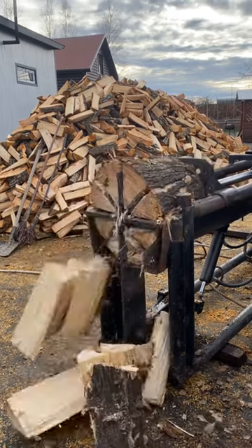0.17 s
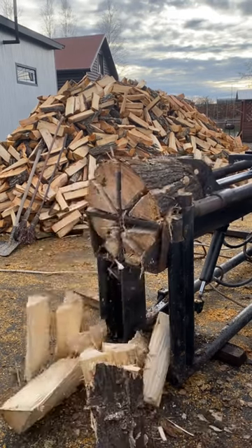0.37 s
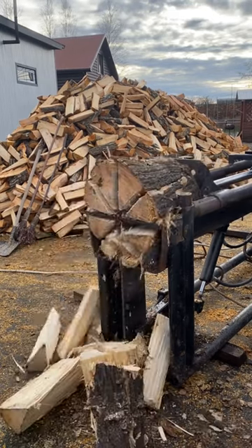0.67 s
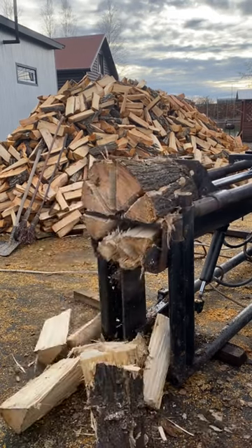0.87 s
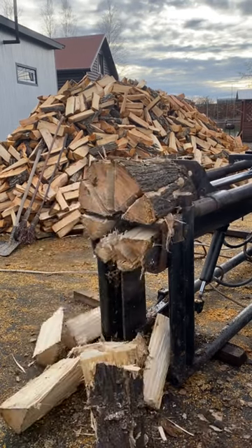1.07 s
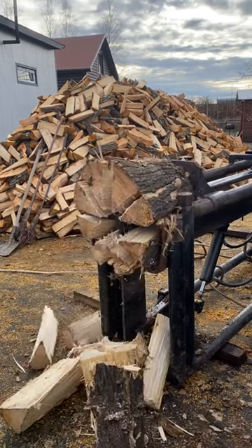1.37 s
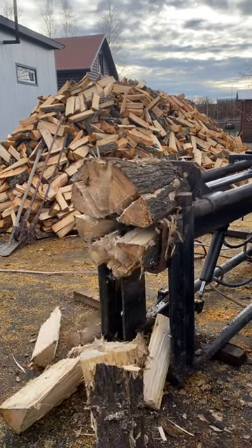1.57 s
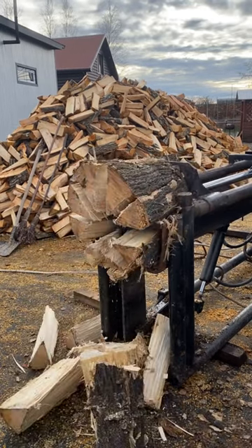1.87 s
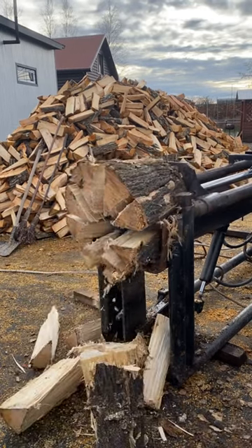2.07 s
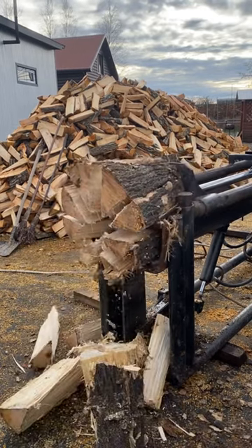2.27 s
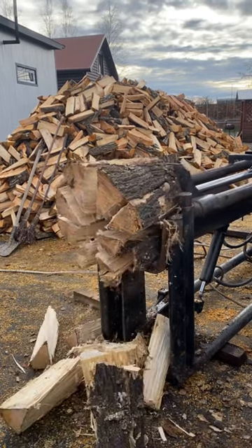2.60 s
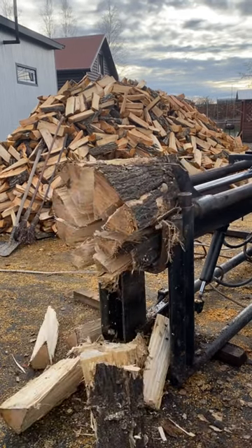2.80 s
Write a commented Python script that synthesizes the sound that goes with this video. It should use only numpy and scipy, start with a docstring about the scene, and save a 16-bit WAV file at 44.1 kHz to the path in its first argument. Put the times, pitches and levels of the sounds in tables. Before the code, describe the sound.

Log splitter engine drones with a whining hydraulic pump while split wood thumps, cracks and knocks

```python
"""An engine drones and a hydraulic pump whines: a petrol log splitter in an open yard, sagging a little under
load. Split pieces thump and clatter to the ground; the next log crackles on the wedge, then gives way in hollow
knocks. The wood is close, and its loudest peaks are flattened hard. At the end the ram bites: the pump sags,
its whine swells in the valve. Engine and pump are sums of harmonics on one shaft; roar and rumble are shaped
noise. Cracks are noise bursts through resonances; thumps and knocks are damped modes, with a few dull echoes."""
import sys
import numpy as np
from scipy import signal
from scipy.fft import rfft, irfft
from scipy.io import wavfile

SR = 44100
rng = np.random.default_rng(int(sys.argv[2]) if len(sys.argv) > 2 else 0)


def int16_out(signal):
    """Quantize to a 16-bit WAV file."""
    q = np.round(np.clip(np.atleast_2d(signal).T, -1, 1) * 32767)
    wavfile.write(sys.argv[1], SR, q.astype(np.int16))


N = 129654  # samples, just under three seconds

# Dull rumble of air and shifting wood. Each row: time in seconds, level in dB before a slow sway.
RUMBLE_LEVEL = [(0, -30.5), (.25, -34), (.45, -34.5), (.65, -33.5), (1.1, -39), (1.85, -38.5), (2.06, -27),
                (2.2, -43), (2.4, -31.5), (2.7, -33), (2.94, -30)]
# Resonances of the rumble. Each row: frequency in Hz, width in Hz, relative level in dB.
RUMBLE_MODES = [(66, 21.5, 2), (278, 140, -1.6)]
RUMBLE_SWAY_DB = 1.5

# Spectrum of the engine and fan noise. Each row: frequency in Hz, relative density in dB per Hz.
ROAR_SPECTRUM = [(25, -24), (80, -24), (130, -12), (200, -13.5), (430, -7), (520, -16), (620, -10.5),
                 (760, -13), (950, -16), (1200, -20.5), (1620, -13), (1950, -13.5), (2400, -22),
                 (3100, -17), (4000, -20.5), (4550, -8.5), (4900, -19.5), (5500, -14.5), (7000, -25.5),
                 (8600, -22), (9900, -37)]
# Gain of the noise below about 1 kHz. Each row: time in seconds, gain in dB before a slow sway.
ROAR_LOW_LEVEL = [(0, -21), (.45, -27.5), (.75, -28.5), (1.1, -25.5), (1.6, -24.5), (1.95, -25),
                  (2.09, -15.5), (2.17, -21.5), (2.5, -21), (2.94, -26)]
# Gain of the noise above it. Each row: time in seconds, gain in dB before a flicker.
ROAR_HIGH_LEVEL = [(0, -38), (.35, -26), (.5, -54), (.57, -29), (.8, -29), (.96, -31), (1.0, -29.5),
                   (1.3, -28), (1.58, -27), (1.63, -30), (2.0, -29), (2.28, -24), (2.35, -27.5), (2.8, -30),
                   (2.94, -23.5)]
# Valve ticks in each engine cycle. Each row: share of the cycle, width as share of the cycle, strength.
VALVE_TICKS = [(.23, 0.14, 1), (0.499, 0.011, 1)]
PUMP_FLUTTER = 0.13  # depth of the pump's pulsing, on the same scale as the tick strength
ROAR_SWAY_DB, HISS_FLICKER_DB = 1.5, 0.8

# Shaft speed as the pump pulse rate. Each row: time in seconds, rate in Hz.
PULSE_RATE = [(0, 197.7), (.85, 197.6), (1.5, 197.3), (2.05, 196.5), (2.13, 197.3), (2.7, 197.7),
              (2.84, 197.4), (2.94, 191.1)]
PULSES_PER_FIRING = 8
# Strong exhaust orders. Each row: multiple of the firing rate, relative level in dB.
EXHAUST_ORDERS = [(3, -40), (7, -41), (9, -37.5), (11, -40), (13, -38.5), (15, -44), (17, -38), (18, -35),
                  (21, -48.5), (25, -37.5), (34, -43.5), (38, -41.5), (66, -47), (67, -42), (68, -41),
                  (69, -40)]
# Weak engine orders. Each row: frequency in Hz, relative level of each order in dB.
BUZZ_SPECTRUM = [(25, -69), (150, -59), (290, -43), (400, -50), (520, -49), (800, -55), (1200, -50),
                 (1500, -51), (1800, -46.5), (2080, -47), (2260, -55), (2520, -57), (2900, -50),
                 (3300, -50), (4300, -46.5), (4800, -54), (5600, -52.5), (8000, -55.5), (9500, -60)]
# Gain of the whole engine tone. Each row: time in seconds, gain in dB.
ENGINE_LEVEL = [(0, 2), (.38, -2.5), (.45, -3.5), (.6, -1), (.97, 1.5), (1.0, -3), (1.58, 0), (1.63, -1.5),
                (2.05, 0.5), (2.28, -0.5), (2.33, -1), (2.8, -2.5), (2.94, -2.5)]
BUZZ_SPREAD_DB, EXHAUST_WAVER_DB = 2, 1.5

# Pump harmonics. Each row: multiple of the pulse rate, relative level in dB at first,
# relative level in dB once the wedge is deep in the log.
PUMP_HARMONICS = [(1, -32.5, -31), (2, -21.5, -31.5), (3, -42.5, -31), (4, -37, -44), (5, -31.5, -33),
                  (7, -30.5, -39.5), (8, -22.5, -27), (9, -29, -38), (10, -32, -32), (11, -35.5, -40),
                  (12, -40, -45), (13, -47, -46.5), (15, -41, -41), (16, -34, -37), (18, -38, -48),
                  (19, -37, -40.5), (20, -39.5, -41.5), (21, -51, -44), (22, -37, -47), (23, -31, -37),
                  (26, -38, -41.5), (27, -44, -52), (30, -43, -44), (31, -39, -47.5), (32, -47, -59),
                  (33, -54, -51), (35, -50, -46.5), (36, -47, -47), (37, -44, -49.5), (38, -56, -59),
                  (39, -51, -49.5), (42, -60, -51), (43, -49, -54), (44, -52, -49), (47, -49.5, -49.5)]
DEEP_FROM_S, DEEP_BY_S = 1.136, 1.62
DEEP_GAIN_DB = -1  # added to every deep level
# Gain of the pump tone. Each row: time in seconds, gain in dB.
PUMP_LEVEL = [(0, -4), (.4, -4), (.6, -1.5), (.95, -0.5), (1.03, -3), (1.4, 3.5), (1.62, 2.5), (1.98, 5.5),
              (2.08, 3), (2.2, 4.5), (2.4, 1), (2.65, 3), (2.8, 1), (2.94, -2.5)]
# Extra gain of the hum, the 2nd harmonic. Each row: time in seconds, gain in dB.
HUM_LEVEL = [(0, -3), (.6, -2), (.85, -1), (1.35, 2.5), (1.7, 3.5), (1.95, 1.5), (2.1, -3.5), (2.35, -4.5),
             (2.6, -3.5), (2.94, 2.5)]
# Extra gain of the whine, the 8th and 9th harmonics. Each row: time in seconds, gain in dB.
WHINE_LEVEL = [(0, 3), (.3, 3), (.43, 0.5), (.8, 1), (1.3, -1.5), (1.65, -3.5), (2.08, -1.5), (2.24, -1),
               (2.34, -1.5), (2.7, -4.5), (2.94, -0.5)]
# Valve resonances, climbing with the pressure. Each row: final frequency in Hz, width in Hz, peak gain in dB.
VALVE_MODES = [(1732, 96, 19.5), (4350, 240, 12), (4080, 170, 12.5), (860, 140, 16)]
BITE_FROM_S, BITE_BY_S = 2.83, 2.885
VALVE_CLIMB_PER_S = 0.7  # exponential rate
PHASE_JITTER = 0.008  # radians at the pulse rate
WAVER_DB, WAVER_HZ = 0.6, 3

# Pieces land, the frame shakes. Each row: start in seconds, level in dB before the wood gain,
# pitch in Hz, decay by 60 dB in seconds.
THUMPS = [(0.032, -6, 320, 0.026), (0.1555, 1.5, 334, 0.05), (.158, 0.5, 130, 0.071),
          (0.164, -7, 192, 0.073), (.198, -11, 82, 0.051), (0.29, -8.5, 97, 0.051),
          (.372, -13.5, 143, 0.037), (0.4, -10.5, 358, 0.068), (0.59, -15, 99, 0.13),
          (0.8317, 10.5, 418, 0.01), (.833, -9, 203, 0.062), (0.847, -12, 316, .04), (1.981, -11, 97, .07),
          (2.046, 0, 337, 0.02), (2.058, -13, 108, 0.1), (2.077, -17, 246, 0.062), (2.092, -11, 84, 0.045),
          (2.153, -18, 75.5, .08), (0.01, -16, 120, 0.047), (.235, -18.5, 134, .06),
          (0.072, -11.5, 156, .06), (2.331, -18, 80.2, .08), (2.641, -6.5, 178, 0.045),
          (2.648, -13.5, 80, .07), (2.799, -5.5, 117, 0.047), (2.803, -8.5, 63.3, 0.05),
          (2.863, -4.5, 190, 0.02), (2.881, -13, 79, .09)]
THUMP_RISE_S = 0.0015
WOOD_GAIN_DB = 4.0  # lifts the thumps and the main mode of the knocks

# Fibres snap, pieces clack. Each row: start in seconds, level in dB, decay by 60 dB in seconds, snap pitch in Hz,
# relative level in dB of the woody body, relative level in dB of the bright splinter.
CRACKS = [(0.033, -23, 0.045, 1480, 10.5, -22), (0.039, -24, 0.022, 3500, 2, 15.5),
          (0.0845, -7, 0.022, 4160, -3.5, -3), (.131, -19, 0.02, 4240, 6, 14.5),
          (0.2405, -15.5, 0.028, 2820, 1, -4), (0.2847, -7.5, 0.016, 5050, -18, -1.5),
          (.327, -13, 0.027, 4140, -24, 4), (0.3309, -1.5, 0.015, 4030, -7, -7),
          (0.3422, -9, 0.02, 2650, -1, -15), (0.3775, -6.5, 0.025, 3520, -2.5, 5),
          (0.386, -13, 0.024, 2200, 8, -13), (0.398, -4.5, 0.037, 2130, -1.5, -2.5),
          (.405, -26.5, 0.09, 2320, 12.5, -7), (0.45, -21, 0.019, 1500, 14, -16),
          (0.462, -28.5, 0.018, 5000, -9, 15.5), (.55, -16.5, 0.024, 5170, 5, 1),
          (0.562, -17.5, 0.065, 2020, 4.5, 0), (.689, -12, 0.041, 2110, -7.5, -2.5),
          (.9285, -20.5, 0.1, 3650, -18, 6), (.956, -14, 0.024, 3470, -15, -14),
          (0.969, -12, 0.011, 4400, -17, -1), (0.9793, -11, 0.016, 3040, -21, 12.5),
          (1.3961, -5.5, 0.014, 2010, -3, -0.5), (1.448, -14, 0.023, 4460, -15, 6.5),
          (1.587, -18, 0.025, 4050, 2, 8.5), (1.5989, -1, 0.012, 4400, -10, 3),
          (2.039, -11, 0.02, 1140, 10, -11), (2.041, -20.5, 0.08, 4000, -8, -6),
          (2.2846, 0.5, 0.016, 3440, -4, -2)]
# Resonances of each snap. Each row: multiple of its pitch, width as share of that pitch, relative level in dB.
SNAP_MODES = [(1, 0.37, 0.5), (1.6, 0.58, -2)]
# Resonances of the woody body. Each row: frequency in Hz, width in Hz, relative level in dB.
CRACK_BODY_MODES = [(450, 290, -5.5), (1070, 490, 0)]
# Resonances of the fine crackle. Each row: frequency in Hz, width in Hz, relative level in dB.
CRACKLE_MODES = [(2100, 1300, -1), (4200, 530, -4)]
# Resonances of splinters and crackle. Each row: frequency in Hz, width in Hz, relative level in dB.
SPLINTER_MODES = [(7060, 4600, -2.5), (9380, 1800, -12.5)]
CRACK_RISE_S = 0.0005
CRACKLE_PER_S, CRACKLE_END_S = 58, 1.62
CRACKLE_DB = -25  # the weakest crackle

# The log slips on the wedge. Each row: start in seconds, level in dB before later gains, pitch in Hz,
# decay by 60 dB in seconds, relative level of the overtones in dB.
KNOCKS = [(2.0405, -2.5, 680, 0.019, 1), (2.047, 4, 660, 0.028, -4), (2.061, -2, 647, 0.034, 3),
          (2.3125, 5.5, 637, 0.038, -9), (2.4273, 4.5, 627, 0.044, 2.5), (2.5588, 0.5, 622, 0.059, 5.5),
          (2.629, 3, 638, 0.033, 3.5), (2.697, 7, 625, 0.032, 0.5), (2.7825, 5.5, 635, 0.04, 5)]
# Overtones of the log. Each row: frequency in Hz, relative level in dB, decay by 60 dB in seconds.
LOG_OVERTONES = [(840, -30, 0.059), (1004, -16.5, 0.025), (1130, -12.5, 0.015), (1334, -15.5, 0.016),
                 (2170, -25, 0.023)]
# Resonances of the tearing wood. Each row: frequency in Hz, width in Hz, relative level in dB.
TEAR_MODES = [(286, 92, 1), (655, 330, 4.5)]
KNOCK_RISE_S, OVERTONE_RISE_S = 0.0027, 0.00084
KNOCK_TICK_DB, KNOCK_TICK_S = -14.5, 0.019
TEAR_DB, TEAR_S = -24.5, 0.16

# Echoes from the woodpile and sheds. Each row: delay in seconds, level in dB.
ECHOES = [(.011, -26.5), (.034, -18.5), (.061, -27)]
ECHO_CUT_HZ = 4600
MIC_LOW_HZ, MIC_TOP_HZ, CUTOFF_HZ = 33.4, 9900, 16000


def from_db(db):
    """Decibels to gain."""
    return 10 ** (np.asarray(db) / 20)


def rms_one(x):
    """Scale to unit rms."""
    return x / np.sqrt(np.mean(x ** 2) + 1e-20)


def in_time(rows):
    """A table of times and values as a curve at every sample."""
    return np.interp(np.arange(N) / SR, *np.transpose(rows))


def at_hz(points, hz):
    """Read a spectrum in dB on a log frequency axis."""
    f, db = np.transpose(points)
    return np.interp(np.log(hz), np.log(f), db)


def drift(rate_hz):
    """Slow random wandering of unit rms: noise through two equal poles, drawn at every 40th sample."""
    pole = np.exp(-2 * np.pi * rate_hz * 40 / SR)
    noise = rng.standard_normal(N // 40 + 2002)
    slow = signal.lfilter([1], [1, -2 * pole, pole * pole], noise)[2000:]  # drop the filter's start
    return np.interp(np.arange(N) / 40, np.arange(len(slow)), rms_one(slow))


def resonate(x, modes):
    """Parallel resonances of alternating sign; unit white noise leaves each at its listed level."""
    out = 0
    for k, (hz, width, db) in enumerate(modes):
        r = np.exp(-np.pi * width / SR)
        zeros = np.sqrt((1 - r * r) / 2) * np.array([1, 0, -1])
        poles = [1, -2 * r * np.cos(2 * np.pi * hz / SR), r * r]
        out = out + (-1) ** k * from_db(db) * signal.lfilter(zeros, poles, x + 1e-18)
    return out


def add(out, start_s, sound):
    """Mix a sound in at a time."""
    i = max(int(start_s * SR), 0)
    out[i:i + len(sound)] += sound[:N - i]


def decay(t60):
    """A quarter second of exponential decay, falling 60 dB in t60 seconds."""
    return np.exp(-np.log(1000) * np.arange(SR // 4) / SR / t60)


def ring(hz, t60, rise_s):
    """A damped mode that swells while the contact lasts."""
    fall = decay(t60)
    t = np.arange(len(fall)) / SR
    return np.sin(2 * np.pi * hz * t) * fall * (1 - np.exp(-t / rise_s))


def burst(t60):
    """Tiny fibre breaks as noise that swells quickly and dies."""
    fall = decay(t60)
    rise = 1 - np.exp(-np.arange(len(fall)) / SR / CRACK_RISE_S)
    return fall * rise * rng.standard_normal(len(fall))


def rumble():
    """Air and shifting wood: noise in low resonances, with an uneven level."""
    level_db = in_time(RUMBLE_LEVEL) + RUMBLE_SWAY_DB * drift(6.3)
    return resonate(rng.standard_normal(N), RUMBLE_MODES) * from_db(level_db)


def roar(cycles, turns):
    """Exhaust rumble and mechanical hiss as shaped noise; the hiss pulses with the valves and the pump."""
    hz = np.maximum(np.arange(N // 2 + 1) * SR / N, 1)
    spectrum = rfft(rng.standard_normal(N)) * from_db(at_hz(ROAR_SPECTRUM, hz))
    noise = rms_one(irfft(spectrum, N))
    low = irfft(rfft(noise) / (1 + (hz / 1000) ** 6), N)
    hiss = noise - low
    ticks = sum(gain * np.exp(-((cycles % 1 - at) / width) ** 2) for at, width, gain in VALVE_TICKS)
    pulsing = rms_one(1 + ticks + PUMP_FLUTTER * np.cos(2 * np.pi * turns))
    low_db = in_time(ROAR_LOW_LEVEL) + ROAR_SWAY_DB * drift(3.3)
    hiss_db = in_time(ROAR_HIGH_LEVEL) + HISS_FLICKER_DB * drift(11.0)
    return low * from_db(low_db) + hiss * pulsing * from_db(hiss_db)


def engine(cycles):
    """The firing cycle as a buzz of many orders, with a few strong, wavering exhaust orders."""
    exhaust = 0
    for k, db in EXHAUST_ORDERS:
        gain = from_db(db + EXHAUST_WAVER_DB * drift(10.5))
        exhaust = exhaust + gain * np.cos(2 * np.pi * (round(k) * cycles + rng.random()))

    # one buzz cycle as a wavetable
    orders, size = np.arange(1, 400), 8192
    firing_hz = PULSE_RATE[0][1] / PULSES_PER_FIRING
    db = at_hz(BUZZ_SPECTRUM, orders * firing_hz) + BUZZ_SPREAD_DB * rng.standard_normal(len(orders))
    partials = from_db(db) * np.exp(2j * np.pi * rng.random(len(orders)))
    cycle = irfft(np.r_[0, partials], size) * size / 2
    buzz = np.interp(cycles % 1 * size, np.arange(size), cycle)
    return np.sqrt(2) * from_db(in_time(ENGINE_LEVEL)) * (exhaust + buzz)


def pump(turns):
    """Harmonics of the pressure pulses; their colour shifts as the wedge goes deep and again as the ram bites."""
    deep = in_time([(DEEP_FROM_S, 0), (DEEP_BY_S, 1)])
    bite = in_time([(BITE_FROM_S, 0), (BITE_BY_S, 1)])
    level, rate = in_time(PUMP_LEVEL), in_time(PULSE_RATE)
    climb = np.exp(VALVE_CLIMB_PER_S * (np.arange(N) - N) / SR)  # reaches 1 at the end
    hum, whine = in_time(HUM_LEVEL), in_time(WHINE_LEVEL)
    extra = {2: hum, 8: whine, 9: whine}
    phase = 2 * np.pi * turns + PHASE_JITTER * drift(28)
    out = 0
    for k, early_db, deep_db in PUMP_HARMONICS:
        k = round(k)
        swell = 0
        for hz, width, gain_db in VALVE_MODES:
            distance = (k * rate - hz * climb) / width
            swell = swell + gain_db / (1 + distance ** 2) ** 2
        colour = (1 - deep) * early_db + deep * (deep_db + DEEP_GAIN_DB)
        db = colour + level + bite * swell + extra.get(k, 0) + WAVER_DB * drift(WAVER_HZ)
        out = out + from_db(db) * np.cos(k * phase + rng.normal(0, 1.37))
    return np.sqrt(2) * out


def thumps():
    """Heavy wood meets soft ground: low, quickly damped swings."""
    out = np.zeros(N)
    for start_s, db, hz, t60 in THUMPS:
        add(out, start_s, from_db(db + WOOD_GAIN_DB) * ring(hz, t60, THUMP_RISE_S))
    return out


def cracks():
    """Short bursts of breaking fibres ring the wood, each at its own pitch; fine crackle runs between them."""
    body, snaps, splinter, crackle = np.zeros((4, N))
    for start_s, db, t60, hz, body_db, splinter_db in CRACKS:
        fibres = from_db(db) * burst(t60)
        modes = [(k * hz, width * hz, mode_db) for k, width, mode_db in SNAP_MODES]
        add(snaps, start_s, resonate(fibres, modes))
        add(body, start_s, fibres * from_db(body_db))
        add(splinter, start_s, fibres * from_db(splinter_db))
    # crackle starts at random moments, mostly weak
    starts = np.flatnonzero(rng.random(int(CRACKLE_END_S * SR)) < CRACKLE_PER_S / SR) / SR
    for start_s in starts:
        db = CRACKLE_DB + 2.8 * min(rng.exponential(), 2)
        add(crackle, start_s, from_db(db) * burst(0.03))
    woody = resonate(body, CRACK_BODY_MODES)
    fine = resonate(crackle, CRACKLE_MODES)
    bright = resonate(splinter + crackle, SPLINTER_MODES)
    return snaps + woody + fine + bright


def knocks():
    """Each slip on the wedge ticks, tears briefly and rings the log's hollow main mode and overtones."""
    hollow, ticks, tearing = np.zeros((3, N))
    for start_s, db, hz, t60, overtone_db in KNOCKS:
        overtones = 0
        for mode_hz, mode_db, mode_t60 in LOG_OVERTONES:
            gain = from_db(mode_db + rng.normal(0, 3.1))  # each slip excites them differently
            overtones = overtones + gain * ring(mode_hz, mode_t60, OVERTONE_RISE_S)
        main = from_db(db + WOOD_GAIN_DB) * ring(hz, t60, KNOCK_RISE_S)
        add(hollow, start_s, main - from_db(db + overtone_db) * overtones)
        add(ticks, start_s, from_db(db + overtone_db + KNOCK_TICK_DB) * burst(KNOCK_TICK_S))
        add(tearing, start_s, from_db(db + TEAR_DB) * burst(TEAR_S))
    tick_modes = [(1590, 340, -2.5)]  # Hz, width in Hz, dB
    return hollow + resonate(ticks, tick_modes) + resonate(tearing, TEAR_MODES)


def yard(x):
    """The direct sound and a few dull echoes from the woodpile and sheds."""
    out = x.copy()
    dull = signal.sosfilt(signal.butter(2, ECHO_CUT_HZ, fs=SR, output="sos"), x + 1e-18)
    for delay_s, db in ECHOES:
        add(out, delay_s, from_db(db) * dull)
    return out


def scene():
    """One shaft drives engine and pump; the wood sounds close by, with the yard's echoes."""
    turns = np.cumsum(in_time(PULSE_RATE)) / SR  # pump pulses so far
    cycles = turns / PULSES_PER_FIRING
    machine = rumble() + roar(cycles, turns) + engine(cycles) + pump(turns)
    wood = thumps() + cracks() + knocks()
    return (machine + yard(wood))[None]


def record(dry):
    """A band-limited microphone; the loudest peaks are flattened, and the top is cut again afterwards."""
    low_cut = signal.butter(2, MIC_LOW_HZ, "high", fs=SR, output="sos")
    mic_top = signal.ellip(10, .2, 80, MIC_TOP_HZ, fs=SR, output="sos")
    top_cut = signal.cheby2(12, 70, CUTOFF_HZ, fs=SR, output="sos")
    heard = signal.sosfilt(mic_top, signal.sosfilt(low_cut, dry))
    overloaded = np.clip(heard, -1, 1)
    return signal.sosfilt(top_cut, overloaded)


dry = scene()
out = record(dry)
int16_out(out)
```